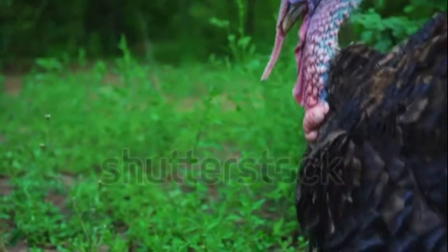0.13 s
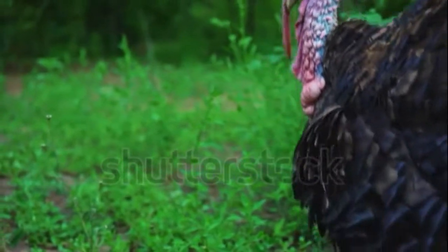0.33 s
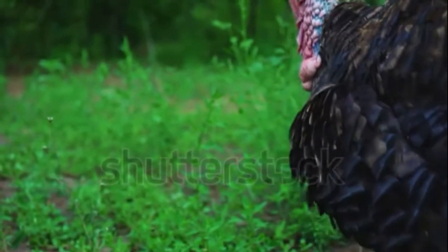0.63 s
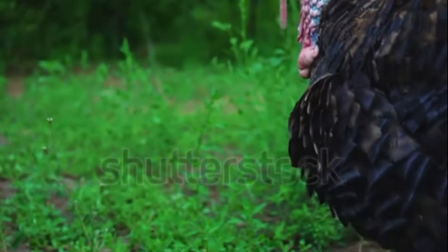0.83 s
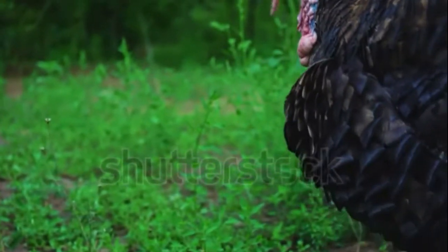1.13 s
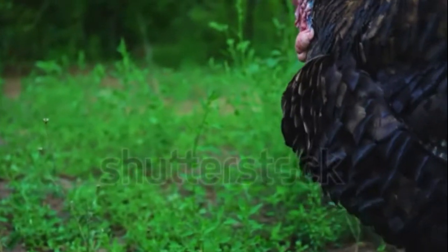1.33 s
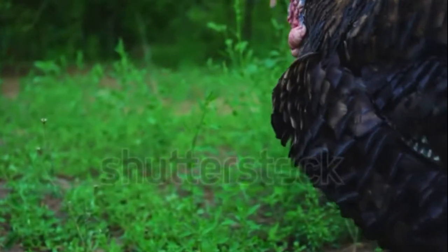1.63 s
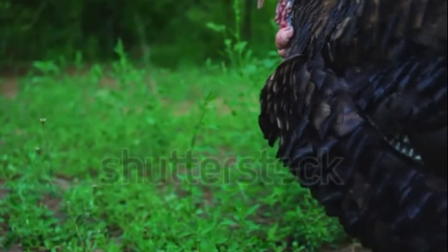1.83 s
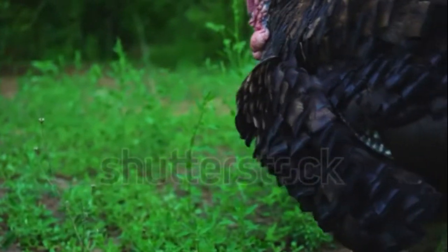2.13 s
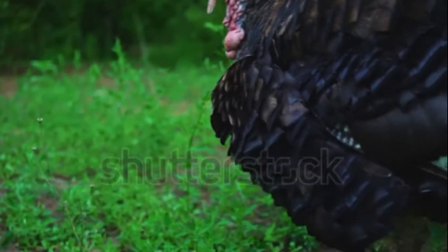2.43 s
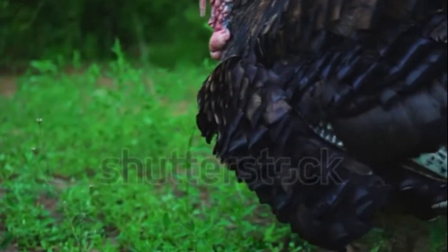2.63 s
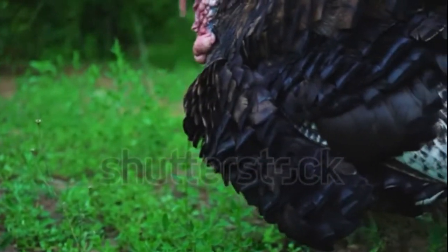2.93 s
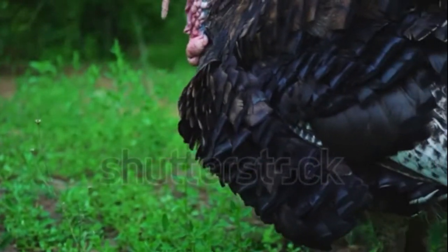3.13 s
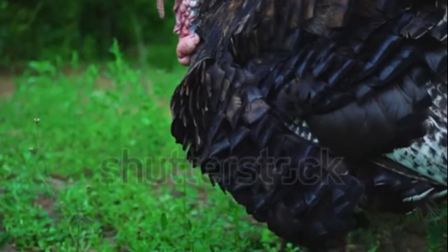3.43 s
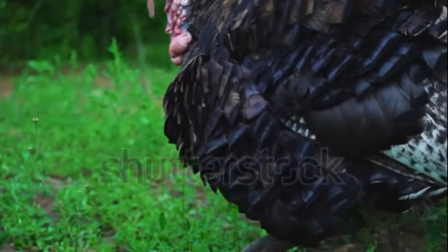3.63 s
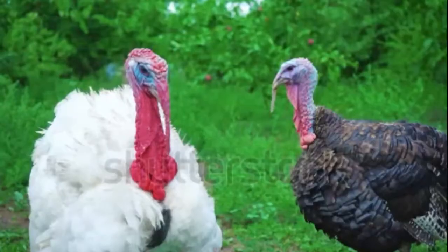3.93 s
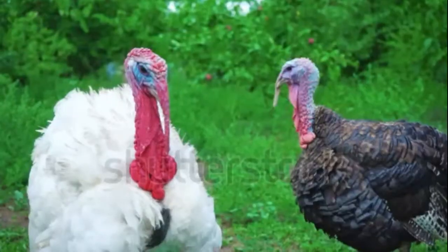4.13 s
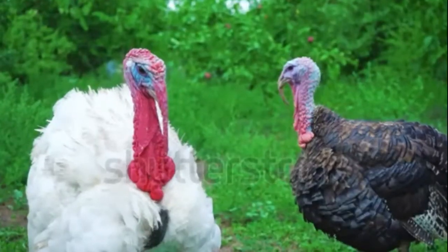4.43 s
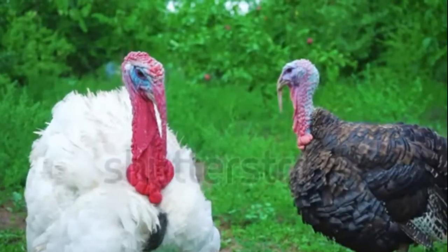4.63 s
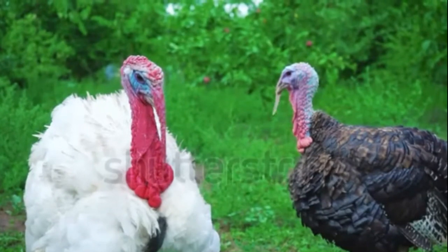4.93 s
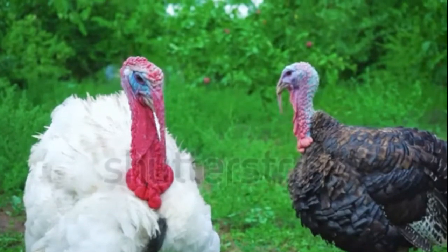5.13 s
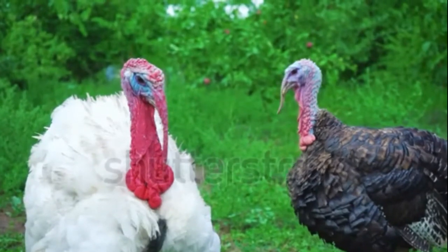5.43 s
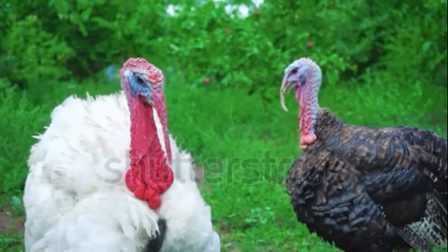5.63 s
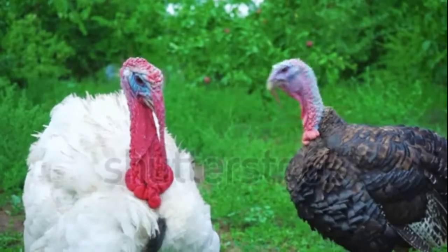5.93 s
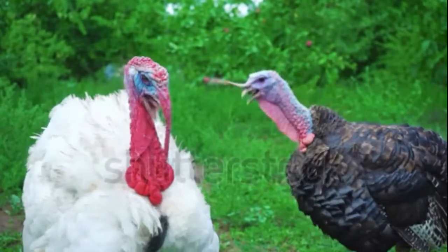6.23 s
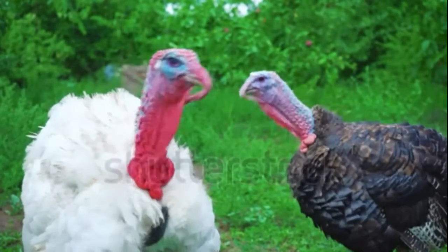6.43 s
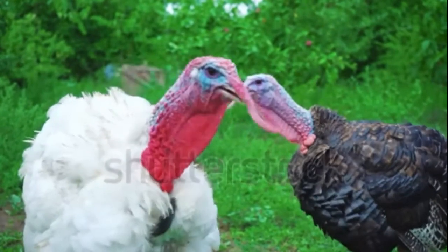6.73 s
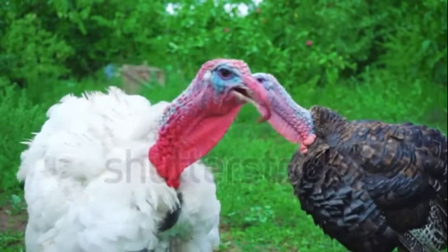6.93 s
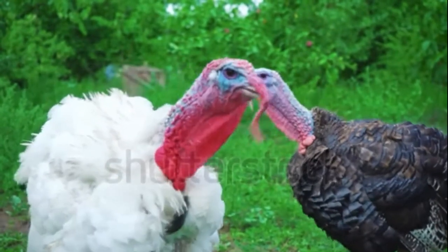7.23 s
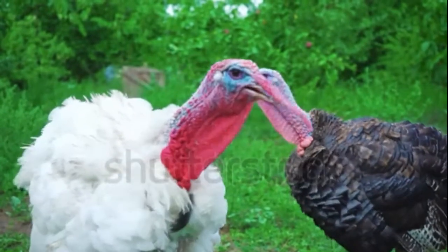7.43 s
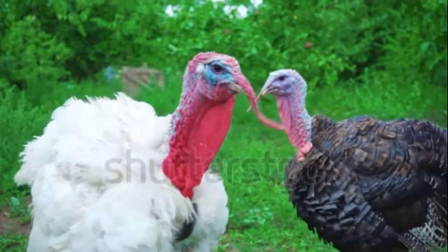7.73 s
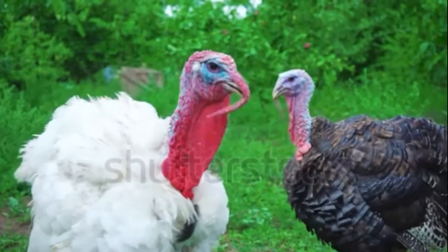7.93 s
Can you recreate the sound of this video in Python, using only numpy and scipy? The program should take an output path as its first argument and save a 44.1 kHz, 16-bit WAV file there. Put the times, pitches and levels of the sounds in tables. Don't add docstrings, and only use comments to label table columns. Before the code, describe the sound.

On an open lawn, turkeys call close to the microphone over very faint air and a weak, wavering low drone. A whistled blip, rasps and yelps open; from 0.5 to 0.9 seconds a tight trill climbs and cuts off. Soft rasps and a hollow cluck around 1.3 lead to the first gobble, 1.6 to 2.1: a held note, then a quick rattle. From 2.3 to 3.4 come crowded whistles, falling yelps, harsh rasps and background bird calls, thinning to quiet notes. A second gobble runs 3.8 to 4.3. Long, shaking, strained yelps and rasps fill 4.6 to 5.5, followed by a quieter spell with a brief low surge near 5.7. A cluck and yelp precede the third gobble at 6.3; after a low cluck, the brighter fourth starts at 7.1. Hollow clucks, rasps and whistles end the scene by 8.1, with only a light outdoor tail.

```python
import sys
import numpy as np
from scipy import signal
from scipy.fft import rfft, irfft
from scipy.io import wavfile
from scipy.ndimage import uniform_filter1d, minimum_filter1d

SR = 44100
rng = np.random.default_rng(int(sys.argv[2]) if len(sys.argv) > 2 else 0)


def invert_db(x):
    u = np.asarray(x, float) / 20
    return 10 ** u


def digitize_waveform(pressure):
    field = np.atleast_2d(pressure).T
    bounded = np.clip(field, -1, 1)
    quanta = np.round(bounded * 32767).astype(np.int16)
    wavfile.write(sys.argv[1], SR, quanta)


N = 356107


def read(points, hz):
    f, value = np.transpose(points)
    return np.interp(np.log(hz + 1), np.log(f + 1), value)


def evened(x):
    return x / np.sqrt(np.mean(x ** 2) + 1e-20)


def span(start_s, length_s):
    at = np.arange(round(start_s * SR), min(round((start_s + length_s) * SR), N))
    return at, np.linspace(0, 1, len(at))


def stepped(rows):
    curve = np.zeros(N)
    for start_s, length_s, value in rows:
        curve[span(start_s, length_s)[0]] = value
    return curve


def soften(x, s):
    size = max(round(s * SR), 1)
    return uniform_filter1d(uniform_filter1d(x, size), size)


def drift(s):
    return evened(soften(rng.standard_normal(N), s))


def coloured(points, x):
    return irfft(rfft(x) * invert_db(read(points, np.fft.rfftfreq(N, 1 / SR))), N)


def resonate(x, hz, width_hz):
    turn, r = np.exp(2j * np.pi * np.cumsum(hz) / SR), np.exp(-np.pi * width_hz / SR)
    return 2 * (turn * signal.lfilter([1 - r], [1, -r], x / turn)).real


# freq_hz, density_db
AIR = [(20, -33), (60, -1.5), (400, -6), (1450, -25.5), (1700, -27), (2330, -28.5), (11500, -29.5),
       (15000, -92.5)]
# time_s, level_db
DRONE = [
    (0.0, -67.5),
    (1.44, -49),
    (2.111, -67.5),
    (3.48, -42),
    (4.001, -63.5),
    (5.51, -82),
    (5.68, -33.5),
    (5.89, -65),
    (7.641, -55),
    (8.07, -47.5),
]


def ground():
    air = invert_db(-51) * evened(np.array([coloured(AIR, rng.standard_normal(N)) for _ in range(2)]))
    drone_hz = np.full(N, 72.)
    hum = resonate(resonate(rng.standard_normal(N), drone_hz, 37.0), drone_hz, 31.0)
    return air + invert_db(np.interp(np.arange(N) / SR, *np.transpose(DRONE))) * evened(hum)


def yard(x, t60_s, delay_s):
    t = np.arange(SR) / SR
    tail = rng.standard_normal((2, SR)) * invert_db(-60 * t / t60_s) * (t > delay_s)
    return signal.fftconvolve(x[None], tail / np.linalg.norm(tail[0]), axes=1)[:, :N]


# start_s, length_s, level_db, pitch_from_hz, pitch_to_hz
FLOCK = [(1.39, .1, -45, 1250, 1282), (1.611, .032, -26, 1200, 560), (1.764, 0.035, -33.5, 600, 660),
         (1.831, 0.0159, -36.5, 560, 750), (1.935, 0.0364, -33, 750, 500), (2.371, 0.02, -28.5, 850, 1050),
         (2.512, 0.037, -28, 850, 800), (2.541, .075, -20, 1980, 2200), (2.618, 0.02, -23.5, 2600, 2550),
         (2.784, 0.087, -22, 1750, 2045), (2.953, 0.034, -19.5, 640, 700), (3.005, .045, -33, 650, 550),
         (3.12, .055, -25.5, 1200, 1120), (3.202, .025, -25.5, 980, 1000),
         (3.276, 0.025, -26.5, 1150, 1150), (3.312, 0.06, -22, 1120, 1050),
         (3.602, 0.019, -31.5, 1450, 2000), (3.643, .062, -35.5, 780, 570), (3.854, 0.019, -25, 620, 520),
         (4.058, 0.034, -30, 640, 558), (6.272, .068, -22.5, 1280, 1050), (7.247, 0.025, -30, 560, 553.8),
         (7.3, .058, -36, 650, 500), (7.505, 0.039, -39.5, 570, 540), (7.873, 0.0252, -29, 620, 900),
         (7.901, 0.049, -30.5, 850, 1060), (7.945, .055, -28, 1880, 2050)]


def flock():
    return yelps([(*row, -15.5) for row in FLOCK])


# start_s, length_s, level_db, mouth_from_factor, mouth_to_factor
RASPS = [(0.105, 0.086, -14.5, 1.08, 0.83), (0.389, 0.1, -14.5, 1.01, 0.94),
         (1.092, 0.035, -30.5, 0.67, 0.7), (1.221, 0.041, -42, 0.5, 0.79), (1.459, 0.039, -43, 0.81, .7),
         (1.498, 0.072, -37.5, 0.98, 0.45), (2.52, 0.11, -17, 0.88, 1.1), (2.747, 0.032, -30.5, 0.49, 0.92),
         (2.78, 0.11, -14, 0.84, 0.91), (2.903, 0.036, -15.5, 0.46, .8), (2.976, 0.018, -19.5, 0.75, 0.78),
         (3.036, 0.067, -22, 0.46, 0.2), (3.078, 0.037, -14.5, 0.62, 0.82), (3.203, 0.071, -36, 1.21, 0.47),
         (3.303, 0.068, -36, 1.3, 1.3), (3.389, 0.046, -43.5, .7, 0.95), (3.465, 0.078, -36, 0.64, 0.65),
         (3.574, 0.071, -35.5, 1.1, 0.37), (3.706, 0.14, -42.5, 0.7, 0.71), (5.622, 0.036, -41, 1.7, 1.1),
         (5.691, 0.057, -42.5, 1.1, 1.9), (5.986, 0.075, -35.5, 0.44, 0.98), (6.216, 0.011, -18, 1.2, 0.84),
         (6.85, 0.052, -29.5, 0.69, 0.73), (5.072, 0.038, -39.5, 1.3, 1.3), (5.254, 0.035, -37, 1.2, 1.3),
         (5.106, 0.039, -27, 0.76, 0.95), (5.224, 0.034, -24, 1.6, 1.1), (5.29, 0.036, -21, 1.5, 0.74),
         (5.429, 0.034, -18.5, 1.3, 0.8), (7.319, 0.032, -23.5, 0.71, .95),
         (7.828, 0.041, -27.5, 1.2, 0.57), (7.875, .018, -36.5, 0.73, 0.74), (7.945, 0.045, -28, 0.65, 1.1)]
# freq_hz, width_hz, level_db
MOUTH = [(1050, 880, 2), (2107, 660, 10.5), (3730, 400, -3.5), (4714, 350, -0.5), (8100, 4200, -7)]


def rasps(beats_per_s=900, size_db=2.5, wobble=.28):
    level, mouth = np.zeros(N), np.ones(N)
    for start_s, length_s, level_db, mouth_from, mouth_to in RASPS:
        at, u = span(start_s, length_s)
        level[at] = invert_db(level_db) * np.sin(np.pi * u) ** (.35 if level_db > -22 else .6)
        mouth[at] = mouth_from + (mouth_to - mouth_from) * u
    chance = rng.random(N // 40 + 1).repeat(40)[:N]
    rate = beats_per_s * (1 - wobble / 2 + wobble * chance)
    beats = np.diff(np.floor(np.cumsum(rate) / SR), prepend=0)
    pulses = beats * invert_db(size_db * rng.standard_normal(N)) + .03 * rng.standard_normal(N)
    turned = np.clip((mouth - .3) / .6, .5, 1)
    rung = 0
    for k, (hz, width_hz, ring_db) in enumerate(MOUTH):
        ring = resonate(resonate(pulses, hz * mouth, width_hz), hz * mouth, 2 * width_hz)
        rung = rung + (-1) ** k * invert_db(ring_db) * turned ** max(k - 1, 0) * evened(ring)
    return soften(level, 0.0017) * invert_db(1.3 * drift(0.01)) * evened(rung)


# freq_hz, level_db
UPPER = [(1200, -15.5), (2000, -7.5), (2700, -23.5), (3600, -29), (4600, -35.5), (6000, -41), (8000, -48.5),
         (11000, -52)]
# freq_hz, level_db
BREATH = [(400, -24), (1000, -5.5), (2000, -15), (5000, -9), (8000, -11.5), (11000, -21.5)]


def syrinx(hz, level, second_db, half, jitter, upper_db, flutter_db, breath_db=-33, rings=(), upper_half=0):
    turns = 2 * np.pi * np.cumsum(hz * (1 + jitter * drift(0.002))) / SR
    flutter = [invert_db(flutter_db * drift(0.0035)) for _ in range(4)]
    tone = flutter[0] * np.sin(turns) + flutter[1] * invert_db(second_db) * np.sin(2 * turns + 1)
    tone = tone / np.sqrt(1 + invert_db(2 * second_db))
    uneven = [invert_db(4.5 * drift(0.012)) for _ in range(5)]
    effort = abs(level) / (1e-9 - minimum_filter1d(-level, size=SR // 25))
    upper = 0
    for k in range(3, 14):
        ring_db = sum(share * read(ring, k * hz) for share, ring in rings)
        gain = invert_db(read(UPPER, k * hz) + upper_db * np.log2(k * hz / 1100) + ring_db) * (k * hz < SR / 3)
        come_and_go = uneven[k % 5] ** min((k - 2) / 3, 1)
        upper = upper + gain * flutter[k % 4] * come_and_go * np.sin(k * turns + k * k)
    beat = np.sin(turns / 2)
    tone = (tone + effort ** .8 * upper * (1 + upper_half * beat)) * (1 + half * beat)
    breath = invert_db(breath_db + 2 * flutter_db) * evened(coloured(BREATH, rng.standard_normal(N)))
    return level * (np.sqrt(2) * tone + breath)


# start_s, length_s, level_db, top_hz, second_over_first_db
CLUCKS = [
    (3.185, 0.084, -26.5, 778.4, 5),
    (6.085, 0.077, -20.5, 870.5, 0.5),
    (6.971, 0.11, -27.5, 704, 3),
]


def clucks(rise_share=.57, low_hz=545.5):
    rows = []
    for start_s, length_s, level_db, top_hz, second_db in CLUCKS:
        rise_s = rise_share * length_s
        rows += [(start_s, rise_s, level_db, low_hz, .92 * top_hz, second_db),
                 (start_s + rise_s, (1 - rise_share) * length_s, level_db - 2, top_hz, low_hz, second_db - 9.5)]
    return rows


# start_s, length_s, level_db, top_hz, aloft_s
LEAPS = [
    (0.161, 0.067, -26, 2637, 0.035),
    (2.977, 0.13, -14, 1981, 0.04),
    (5.106, 0.145, -13, 1563, 0.024),
    (5.292, .17, -13, 2069, .049),
    (6.209, 0.084, -19.5, 2104, 0.038),
]
# pitch_from_hz, pitch_to_hz
TAIL_HZ = [
    (1000, 870),
    (871, 680),
]


def leaps(run_up_s=.028, landing_hz=1250, tail_split=.7):
    rows = []
    for start_s, length_s, level_db, top_hz, aloft_s in LEAPS:
        up_s, tail_s = start_s + run_up_s, length_s - run_up_s - aloft_s
        second_db = max(20. * (level_db + 13.0), -32.)
        sink_hz = 1480 if level_db > -15.5 else .92 * top_hz
        land_hz = landing_hz + .15 * (top_hz - landing_hz)
        rows += [(start_s, run_up_s, level_db, 720, 1080, -2.),
                 (up_s, aloft_s / 2, level_db - 1, top_hz, .96 * top_hz, second_db),
                 (up_s + aloft_s / 2, aloft_s / 2, level_db - 1, sink_hz, land_hz, second_db)]
        if tail_s > .02:
            for k, tail_second_db in enumerate((1, 4)):
                rows.append((up_s + aloft_s + k * tail_split * tail_s, abs(k - tail_split) * tail_s,
                             level_db, *TAIL_HZ[k], tail_second_db))
    return rows


# start_s, level_db, pitch_from_hz
TRILL = [
    (0.575, -12, 809),
    (0.625, -13.5, 860),
    (0.677, -11.5, 930),
    (.725, -9.5, 927),
]
# start_s, length_s, level_db, pitch_from_hz, pitch_to_hz
TRILL_LEAD = [
    (0.482, .064, -10, 750.1, 790),
    (0.546, 0.02894, -12, 880.5, 850),
]
# start_s, length_s, level_db, pitch_from_hz, pitch_to_hz
TRILL_END = [
    (0.766, .04, -9, 939, 1099),
    (0.806, 0.039, -9, 955, 1080),
    (0.848, 0.049, -9, 990, 1041),
    (0.901, 0.0088, -29, 1610, 1300),
    (0.91, 0.01, -17.5, 952, 648.8),
]


def trill(slide_s=.007, hold_s=.024, flick_hz=1640):
    rows = [(*row, -19) for row in TRILL_LEAD + TRILL_END]
    following = [row[0] for row in TRILL[1:] + TRILL_END]
    for (start_s, level_db, pitch_hz), after_s in zip(TRILL, following):
        up_s = start_s + hold_s + slide_s / 2
        rows += [(start_s, hold_s, level_db, pitch_hz, 1040, -19),
                 (up_s, after_s - up_s - slide_s / 2, level_db - 13, flick_hz, .93 * flick_hz, -5)]
    return rows


# start_s, length_s, level_db, pitch_from_hz, pitch_to_hz
CALLING = [(0.086, 0.051, -22.5, 887.5, 895), (0.264, .009, -27.5, 894, 840),
           (0.269, 0.035, -14.5, 857, 840), (.304, 0.013, -22.5, 834, 700), (0.379, 0.023, -31.5, 852, 916),
           (2.286, 0.029, -36.5, 1243, 1376), (2.318, 0.056, -25.5, 1386, 1405),
           (2.459, 0.043, -24.5, 926, 974), (2.59, 0.033, -20, 764, 711), (2.625, 0.13, -14.5, 854, 726),
           (2.741, 0.043, -17, 695, 479.2), (2.788, 0.054, -24.5, 947, 960), (2.851, 0.08, -15, 950, 738.5),
           (2.932, 0.024, -26.5, 666.5, 684.7), (3.298, 0.035, -21, 617.7, 674),
           (3.336, 0.029, -23, 684, 595), (4.426, 0.027, -34.5, 805.5, 1185), (4.612, .012, -44, 892, 922),
           (4.623, .033, -13, 895, 970), (4.69, 0.13, -19, 943, 826), (4.811, 0.21, -12.5, 880, 752),
           (5.005, 0.077, -14.5, 700, 541.4), (5.823, 0.095, -30.5, 897.6, 786),
           (5.925, 0.059, -32, 890, 720), (5.979, 0.07, -26.5, 719, 560), (7.827, 0.038, -22.5, 927, 1029),
           (7.861, 0.043, -25, 912, 956),
           (0.075, 0.017, -37.5, 872.4, 881), (1.151, 0.04, -38.5, 975, 810),
           (1.195, 0.036, -37.5, 556, 780), (1.245, .045, -40, 800, 964), (1.514, .036, -24.5, 710, 589),
           (1.553, 0.04114, -24, 600, 640), (1.591, 0.02, -25.5, 650, 747),
           (3.105, 0.021, -18, 608.6, 572.4), (3.154, 0.0255, -27, 600, 618.6),
           (3.37, 0.03, -29.5, 600, 619.4), (3.397, 0.042, -29.5, 620, 716), (3.667, .022, -26, 960, 1050),
           (5.748, .029, -37.5, 800, 935.4), (5.772, .048, -35.5, 1290, 1208),
           (6.799, 0.015, -49.5, 600, 580), (6.913, 0.026, -39.5, 690, 760),
           (7.634, 0.058, -29.5, 567, 568), (7.719, 0.029, -34, 560, 596.5), (7.787, .014, -35.5, 590, 560)]
# pitch_hz, second_over_first_db
VOICING = [(550, 2.5), (620, -0.5), (720, 7.5), (900, 3), (1000, -2.5), (1400, -5.5)]
# start_s, length_s, level_db, pitch_from_hz, pitch_to_hz
WHISTLES = [(0., 0.016, -19, 2170, 1133), (0.013, 0.013, -23, 1000, 653), (1.383, .024, -30, 691, 542),
            (1.497, 0.011, -32, 1250, 1300), (2.37, 0.012, -12, 1534, 2440), (2.382, .026, -29, 1330, 1406),
            (2.413, 0.014, -27.5, 2258, 1340), (2.429, 0.034, -27, 1323, 1250),
            (2.508, 0.058, -18, 1240, 1193), (3.441, 0.021, -31, 642, 520), (3.465, 0.052, -33, 957, 1120),
            (3.525, 0.047, -29, 1200, 1000), (3.576, .03, -31, 1200, 1150),
            (3.628, 0.037, -29.5, 1000, 974), (3.744, 0.018, -29, 678, 514), (3.796, 0.049, -31, 602, 605),
            (4.456, 0.024, -46.5, 1328, 1480), (4.512, 0.1, -52, 1050, 988),
            (4.651, 0.03, -22.5, 1477, 1315), (7.805, 0.016, -26, 1093, 1050),
            (7.9, 0.048, -30.5, 1322, 1243), (7.979, 0.03, -17.5, 684, 612), (8.014, .036, -25, 1157, 1085),
            (8.052, .04, -21.5, 1117, 1158)]
# start_s, length_s, level_db, pitch_from_hz, pitch_to_hz
HOLLOW = [
    (1.291, .075, -18.5, 588.5, 670),
    (1.364, 0.018, -24, 680.4, 730),
    (7.596, .015, -23.5, 570, 570),
    (7.612, 0.027, -21.5, 571.2, 570),
    (7.772, 0.018, -26.5, 601, 560),
    (7.951, 0.026, -20.5, 618.3, 650),
]


def near_notes():
    notes = [(*row, read(VOICING, np.sqrt(row[3] * row[4]))) for row in CALLING]
    notes += [(*row, -17.5) for row in WHISTLES]
    notes += [(*row, 12) for row in HOLLOW]
    return sorted(notes + clucks() + leaps() + trill())


# start_s, length_s, rate_from_hz, rate_to_hz, depth_from, depth_to (log pitch)
WARBLES = [
    (4.711, .29, 38, 41, .075, .025),
    (2.46, .043, 23, 23, -.04, -.04),
    (5.96, .09, 45, 45, .04, .05),
    (2.632, .09, 40, 40, .03, .03),
    (1.304, .066, 30, 30, .06, .06),
    (8.012, .045, 32, 32, .07, .07),
    (5.84, .12, 22, 30, .04, .04),
    (5.178, .07, 28, 28, .05, .03),
    (5.368, .09, 22, 22, .06, .03),
]
# start_s, length_s
CLOSE = [
    (0, .95),
    (1.28, .13),
    (1.51, .09),
    (2.28, .28),
    (3.11, .07),
    (3.27, .1),
    (3.52, .05),
    (4.4, 1.8),
    (7.6, .05),
    (7.95, .12),
]
# start_s, length_s, half_pitch_db
HALVES = [
    (5.004, 0.073, -4.5),
    (5.435, 0.027, -21.5),
    (6.005, .075, -7.5),
    (6.085, 0.024, -10.5),
]
# start_s, length_s, share (under 0 when turned away)
GAPES = [(.09, .05, .5), (1.15, .09, .6), (1.28, .13, -.6), (1.5, .12, -.3), (2.5, .06, 1.3),
         (2.63, .09, -.5), (2.89, .045, .5), (3.29, .075, 1.5), (3.37, .08, .8), (5.74, .21, -.5),
         (5.96, .21, .5), (7.59, .23, .9), (7.89, .18, .6)]
# freq_hz, level_db
SHUT_BEAK = [(2400, -7), (3100, 8), (4300, 10), (5200, -8), (6500, 4), (8100, -3), (9200, 10), (10500, -3)]
# freq_hz, level_db
WIDE_BEAK = [(1700, -3), (2300, -6), (2850, 12), (3400, 14), (4000, -3), (4700, 7), (5500, -2)]
# freq_hz, level_db
STRAINED = [(2000, 5), (2900, 10), (4000, 10), (5200, 7), (7000, 2)]


def yelps(rows, glide_s=.003, swell_s=0.0094, near=False):
    start, length, level_db, hz0, hz1, second_db = np.transpose(rows)
    t, end = np.arange(N) / SR, start + length
    pitch_at = np.c_[start + .0005, end - .0005].ravel()
    hz = soften(np.interp(t, pitch_at, np.c_[hz0, hz1].ravel()), glide_s)
    ramp = np.minimum(0.17 * length, swell_s)
    held = np.c_[start + ramp, end - ramp].ravel()
    pause = start[1:] - end[:-1] > .004
    edges = np.r_[start[0] - .002, end[:-1][pause] + .002, start[1:][pause] - .002, end[-1] + .002]
    knots, values = np.r_[held, edges], np.r_[invert_db(level_db / 2).repeat(2), 0 * edges]
    order = np.argsort(knots)
    level = np.interp(t, knots[order], values[order]) ** 2
    faint = np.clip((-13.5 - np.interp(t, held, level_db.repeat(2))) / 13.0, 0, 1)
    far = faint.copy()
    for start_s, length_s in CLOSE:
        far[span(start_s, length_s)[0]] = 0
    jump = soften(abs(np.gradient(np.log(hz))) * SR, .002)
    level /= 1 + (jump / 77.0) ** 2
    for start_s, length_s, rate0, rate1, depth0, depth1 in WARBLES:
        at, u = span(start_s, length_s)
        cycles = length_s * (rate0 * u + (rate1 - rate0) * u * u / 2)
        shake = (depth0 + (depth1 - depth0) * u) * np.sin(2 * np.pi * cycles)
        hz[at] *= np.exp(shake)
        level[at] *= invert_db(50.0 * shake)
    half = stepped([(start_s, length_s, invert_db(db)) for start_s, length_s, db in HALVES])
    gape = stepped(GAPES)
    strain = np.interp(t, (4.7, 5.1), (0, 1)) * (t < 5.48)
    lead_s = TRILL_LEAD[0][0]
    trilling = (t > lead_s) * np.interp(t, (lead_s, TRILL[1][0]), (.3, 1)) * (t < TRILL_END[-1][0])
    faint *= trilling == 0
    return syrinx(hz, level, np.interp(t, held, second_db.repeat(2)), soften(half, 0.00077),
                  jitter=0.0075 + 0.02 * far, flutter_db=.8 + 3.6 * far,
                  upper_db=-.5 * strain - 2.7 * faint - 6 * (trilling > 0) * (1 - trilling),
                  breath_db=-33 + 5.5 * strain - 2 * trilling - 6 * faint,
                  rings=[(trilling, SHUT_BEAK), (gape, WIDE_BEAK), (strain ** 2, STRAINED)] * near)


# start_s, note_length_s, pitch_hz, last_cluck_s
GOBBLES = [
    (1.622, 0.14, 925, 2.055),
    (3.845, .146, 940, 4.294),
    (6.295, .14, 965, 6.737),
    (7.081, .153, 950, 7.582),
]
# start_s, level_db, flick_top_hz, voice_at_top_db
RATTLE = [(1.795, -12.5, 2660, -13), (1.853, -13, 2694, -19), (1.907, -12, 2807, -13.5),
          (1.96, -13.5, 2739, -22), (2.01, -13.5, 2505, -2.5), (4.028, -14, 2510, -67.5),
          (4.087, -13, 2762, -8), (4.14, -13, 2738, 0), (4.194, -14, 2770, 0.5), (4.246, -12.5, 2267, 1),
          (6.473, -12.5, 2705, -15.5), (6.531, -12.5, 2713, -1), (6.586, -13.5, 2835, -3.5),
          (6.641, -14.5, 2856, 9), (6.693, -14, 1875, 5.5), (7.26, -10, 2500, -16.5),
          (7.324, -16.5, 2310, -21.5), (7.37, -14, 2847, -1.5), (7.425, -15, 3026, 2.5),
          (7.48, -15.5, 2753, -5), (7.53, -16, 2880, 2)]


def runs(hold_s=.027, flick_s=.022, gobble_db=-12):
    out = []
    for start_s, length_s, hz, last_s in GOBBLES:
        beats = [row for row in RATTLE if start_s < row[0] < last_s]
        following = [row[0] for row in beats[1:]] + [last_s]
        rattle = [(at_s, min(hold_s, after_s - at_s - flick_s), level_db, 830, 910, top_hz, top_db)
                  for (at_s, level_db, top_hz, top_db), after_s in zip(beats, following)]
        last_cluck = (last_s, .014, gobble_db - 4.5, 1000, 600, 600, 0)
        out += [[(start_s, length_s, gobble_db, hz, .9 * hz, 2237, 0)], rattle + [last_cluck]]
    return out


# freq_hz, level_db
WINDPIPE = [(500, -14.5), (870, 1), (1300, -9.5), (1750, 1), (2200, -13.5), (2700, -14.5)]
# start_s, length_s, share
SPLITS = [
    (6.3, .075, .7),
    (7.09, .125, .5),
]
# freq_hz, level_db
GOBBLE_BEAK = [(2200, -2.5), (2700, 2), (3600, -3), (4500, 2), (5500, -0.5), (6500, 4), (8000, 2)]
# freq_hz, level_db
SLACK = [(1000, -18), (10000, -22)]


def gobbler(hold_s=.027, flick_db=0.0, shut_s=0.0064, press_db=5):
    hz, level, press = np.full(N, 850.), np.zeros(N), np.zeros(N)
    for rows in runs():
        for k, (start_s, length_s, level_db, hz0, hz1, top_hz, top_db) in enumerate(rows):
            at, u = span(start_s, length_s)
            end_s, short = start_s + length_s, length_s <= hold_s
            hz[at] = hz0 + (hz1 - hz0) * u ** (1.6 if short else .55)
            level[at] = invert_db(level_db)
            if short:
                press[at] = 2 * u - 1
            if k == 0:
                level[at] *= np.minimum(0.12 + u * length_s / 0.012, 1)
            if k + 1 == len(rows):
                at, u = span(end_s, shut_s)
                hz[at] = hz1 + (top_hz - hz1) * u
                level[at] = invert_db(level_db + flick_db) * (top_hz > hz1 * 1.5)
            else:
                at, u = span(end_s, rows[k + 1][0] - start_s - length_s)
                rest = hz1 + (rows[k + 1][3] - hz1) * u
                hz[at] = rest + (top_hz - rest) * np.sin(np.pi * u ** 0.45) ** 1.4
                level[at] = invert_db(level_db + flick_db + top_db * np.sin(np.pi * u ** 1.9) ** 6.1)
    split = stepped(SPLITS)
    hz = soften(hz, 0.0051)
    slope = np.gradient(hz) * SR
    second_db = 9. - 16.4 * np.clip(hz / 950 - 1, 0, 1) + read(WINDPIPE, 2 * hz) - read(WINDPIPE, hz)
    puff_db = -37 + 16 * np.clip(soften(slope, .006) / 3e4, 0, 1)
    falling = np.clip(soften(slope, .003) / -1e4 + np.maximum(hz / 800 - 1.6, 0), 0, 1)
    level = soften(level, 0.0061) * invert_db(read(WINDPIPE, hz))
    hoarse_db = 6 * (np.arange(N) > 7.36 * SR)
    tight_db = soften(press_db / 2 * press + 2.5 * split, .003)
    return syrinx(hz, level, second_db - 18 * falling, 0, jitter=0.003, flutter_db=.6,
                  upper_half=soften(split, .01),
                  upper_db=-2.0 + hoarse_db - 12.0 * np.clip(hz / 1000 - 1, 0, 1) + tight_db,
                  breath_db=puff_db + press_db * press, rings=[(1, GOBBLE_BEAK), (falling, SLACK)])


# freq_hz, left_lead_rad
PORTS = [(300, 1.85), (700, 1), (1150, 0.92), (1450, 0.47), (2000, 0.5), (2600, 1.03), (11000, 0.067)]
# time_s, left_over_right_db
PLACE = [
    (0.0, -4),
    (1.009, 2.5),
    (1.061, -2.5),
    (3.601, -1),
    (5.19, 5),
    (7.621, -3.5),
    (8.07, 4.5),
]


def at_ports(birds):
    lead = np.exp(.5j * read(PORTS, np.fft.rfftfreq(N, 1 / SR)))
    pair = np.array([irfft(rfft(birds) * lead, N), irfft(rfft(birds) / lead, N)])
    ratio = invert_db(np.interp(np.arange(N) / SR, *np.transpose(PLACE)))
    return pair * np.array([ratio, np.ones(N)]) / np.sqrt((1 + ratio ** 2) / 2)


def scene():
    birds = flock() + rasps() + yelps(near_notes(), near=True) + gobbler()
    far = signal.lfilter([.25], [1, -.75], birds)
    near = invert_db(-17) * yard(birds, t60_s=.07, delay_s=.001) + invert_db(-25) * yard(birds, t60_s=.2, delay_s=.004)
    return at_ports(birds) + near + invert_db(-36) * yard(far, t60_s=1.6, delay_s=.02) + ground()


def low_pass(x):
    return signal.sosfilt(signal.butter(12, 11040, fs=SR, output="sos"), x)


def record(dry, knee=1.0):
    mix = knee * np.tanh(dry / knee)
    return low_pass(mix)


dry = scene()
out = record(dry)
digitize_waveform(out)
```